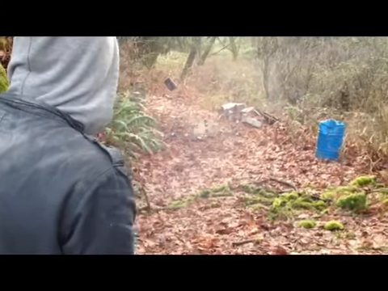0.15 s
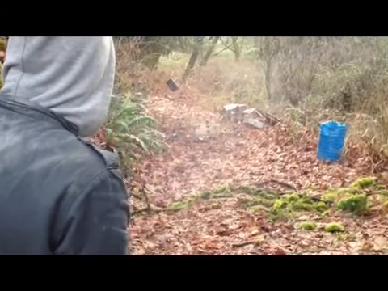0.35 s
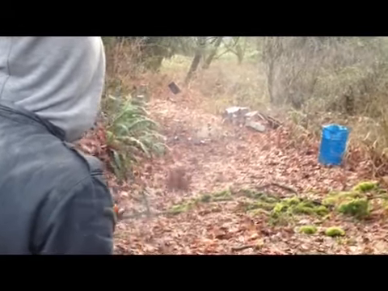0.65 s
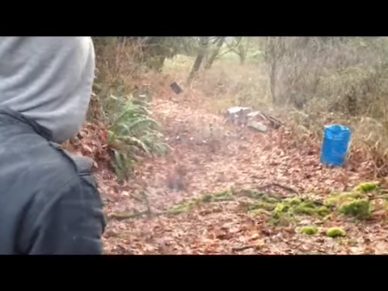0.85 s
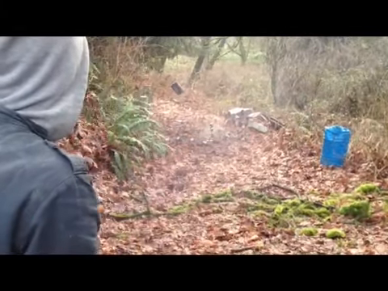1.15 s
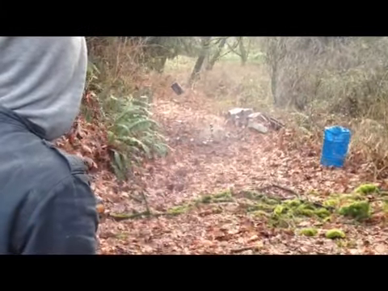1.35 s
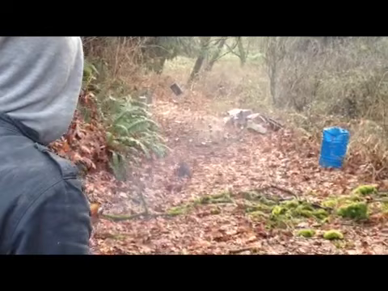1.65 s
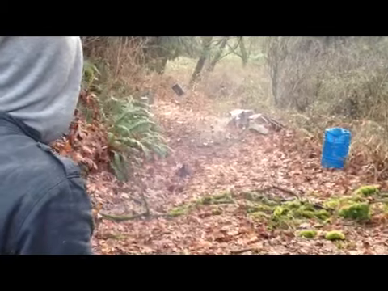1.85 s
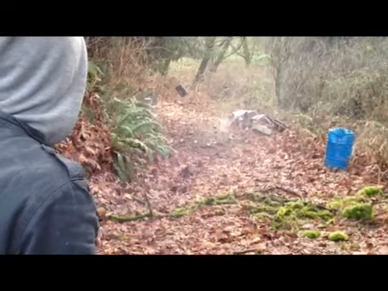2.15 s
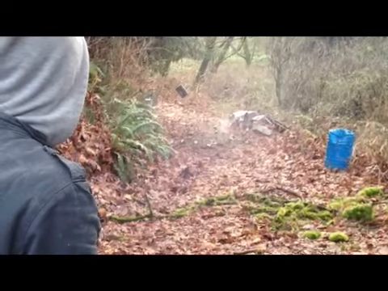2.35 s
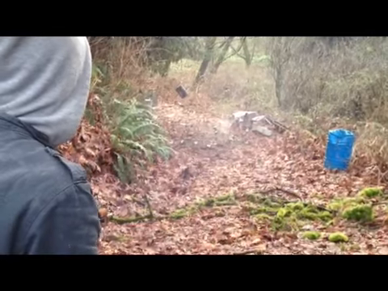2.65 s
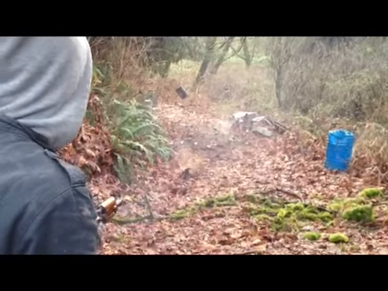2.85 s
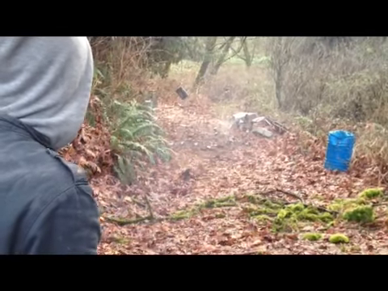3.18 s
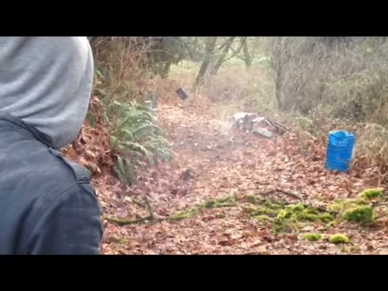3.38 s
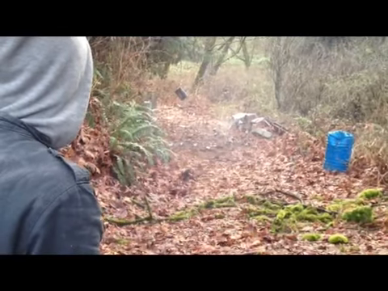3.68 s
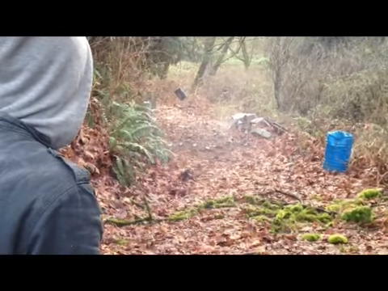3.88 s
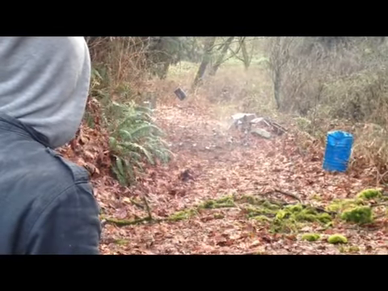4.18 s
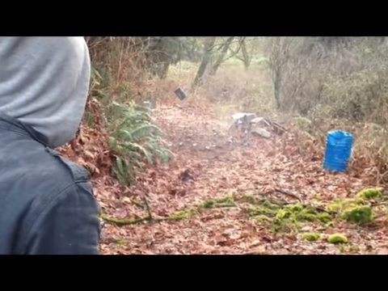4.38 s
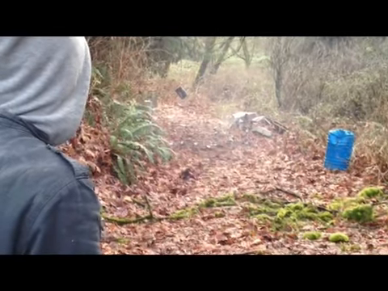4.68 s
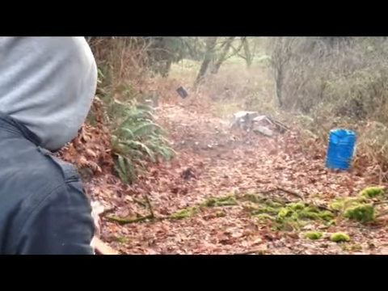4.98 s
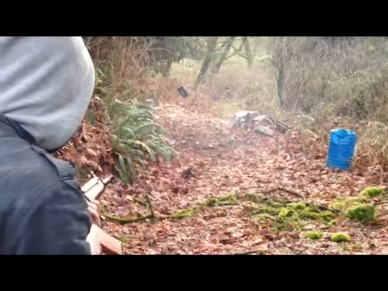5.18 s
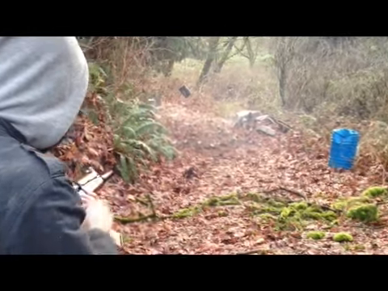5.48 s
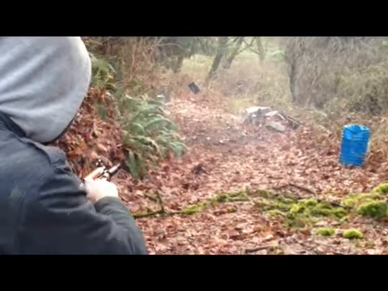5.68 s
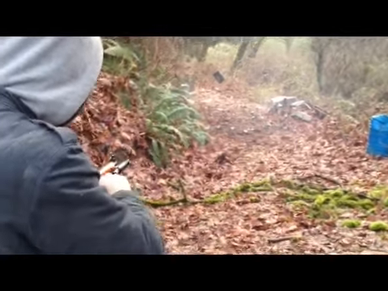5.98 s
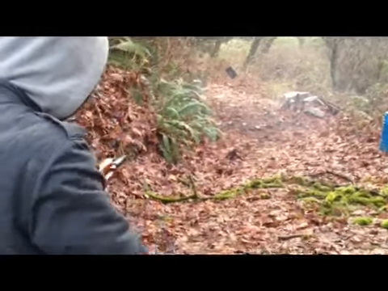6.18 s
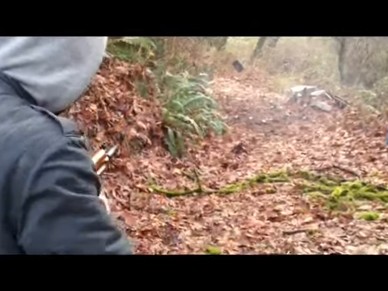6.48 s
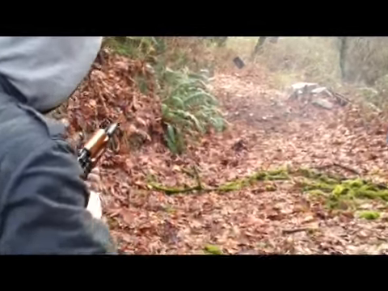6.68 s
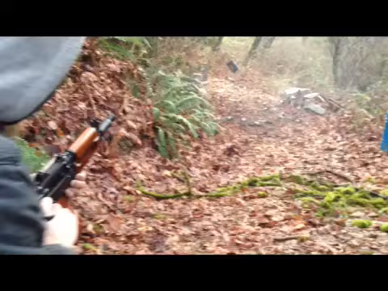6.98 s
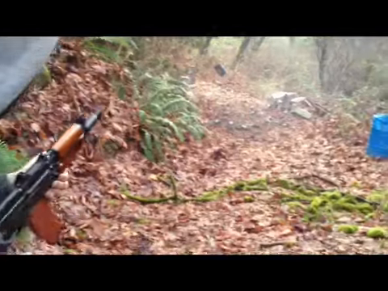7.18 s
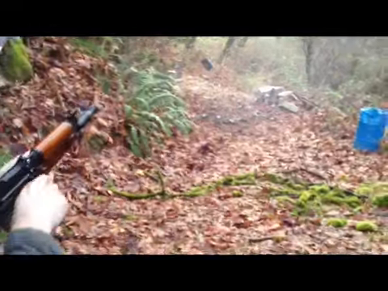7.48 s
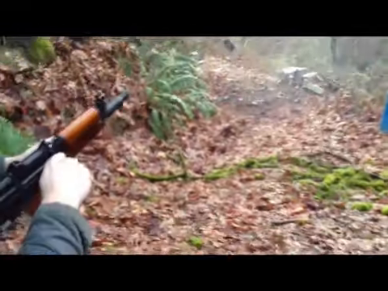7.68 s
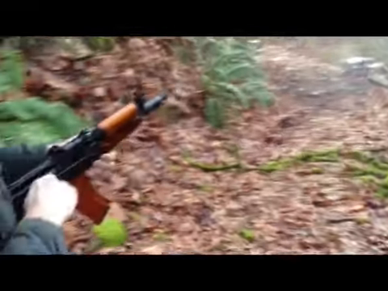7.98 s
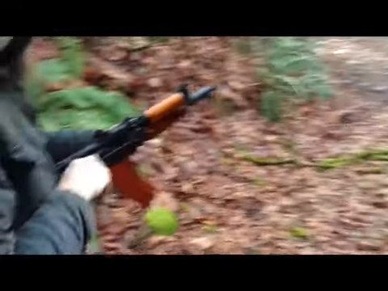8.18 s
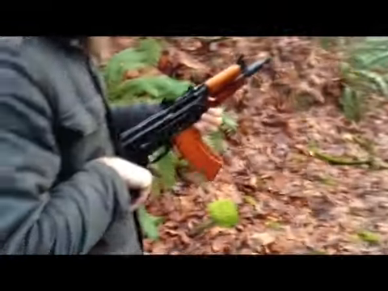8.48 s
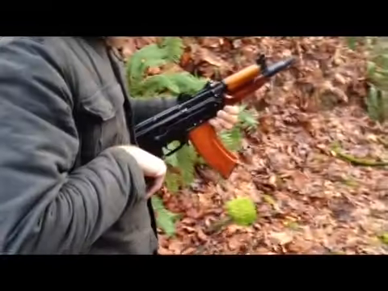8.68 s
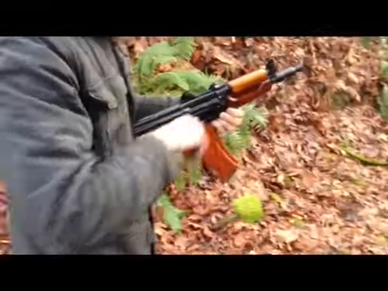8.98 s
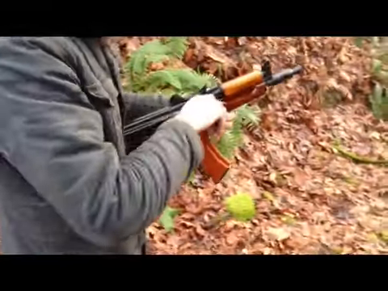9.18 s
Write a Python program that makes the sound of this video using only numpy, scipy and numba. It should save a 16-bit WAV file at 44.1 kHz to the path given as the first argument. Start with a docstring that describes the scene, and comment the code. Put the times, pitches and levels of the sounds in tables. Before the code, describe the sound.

The echo of earlier shots is dying away in a wood at the start. A rifle a couple of metres from the microphone fires three quick pairs of shots, at about 0.6, 1.5 and 2.8 seconds. Each loud, bright blast overloads the microphone and returns from trunks and a far slope in duller echoes that fade by about 5 seconds. Spent cases drop into dry leaves with small crackles until around 4 seconds. Over a faint outdoor hush, the rifle is then handled close by: a short cluster of steel clicks comes at 6.1 seconds, and the bolt snaps home with a hard clack and thin ring at 7.1. A rattling run of clacks follows near 7.9, and the bolt slams shut again at 8.3. Faint sleeve rubs sound between the clacks and around 9 seconds, with one last light click at 9.3.

```python
"""Rifle shots in a wood

A rifle fires quick pairs of shots a couple of metres from a phone; the first pair is already dying away.
Each blast overloads the microphone and comes back from trunks and a far slope; spent cases drop into
dry leaves. Then the bolt is worked by hand in steel clacks, with faint sleeve rubs and hiss between.
The phone's gain control ducks after each loud sound and creeps back."""
import sys
import numpy as np
from scipy import signal
from scipy.fft import rfft, irfft, next_fast_len
from scipy.io import wavfile
from scipy.ndimage import map_coordinates
from numba import njit

SR = 44100
rng = np.random.default_rng(int(sys.argv[2]) if len(sys.argv) > 2 else 0)


def int16_out(signal):
    """Quantize to a 16-bit WAV file."""
    q = np.round(np.clip(np.atleast_2d(signal).T, -1, 1) * 32767)
    wavfile.write(sys.argv[1], SR, q.astype(np.int16))


N = 411894
TIME = np.arange(N) / SR


# The rifle, a couple of metres off. Each row: start in seconds, level in dB.
SHOT_TIMES = [(-0.525, -1.5), (-0.408, -1.5), (0.622, 1.5), (0.730, 1), (1.5002, 2), (1.613, 2),
              (2.7731, 1), (2.9199, 3)]
# The muzzle blast with its bright splash off nearby leaves. Each row: frequency in Hz, level in dB.
BLAST_SPECTRUM = [(40, -16.5), (120, -9.5), (300, 0.5), (1000, 3), (2800, 2.5), (6000, 3), (9000, -6),
                  (15000, -11)]

def shots(blast_db=20, blast_t60=0.1, drift=.0004):
    """Every blast wakes the same echoes, their paths shifted a little as the muzzle moves."""
    out, echoes = np.zeros(N), wood()
    for s, db in SHOT_TIMES:
        paths = np.arange(N) * (1 + drift * rng.standard_normal())
        add(out, s, amp(db) * map_coordinates(echoes, [paths], order=3))
        add(out, s, amp(db + blast_db) * colour(burst(blast_t60), BLAST_SPECTRUM))
    return out


# Slaps off near banks, big trunks and rock faces. Each row: delay in seconds, level in dB.
SLAPS = [(.027, 7.5), (.047, 13), (.097, 7), (.205, -3), (.281, -3), (.417, -5.5), (1.183, -23),
         (1.215, -22.5), (1.355, -25.5), (2.495, -35.5), (4.12, -43)]
# The diffuse return and the slaps, before the air dulls them. Each row: frequency in Hz, level in dB.
DIFFUSE_SPECTRUM = [(40, -58), (75, -38.5), (110, -28), (170, -11), (290, 1), (440, -0.5), (660, 0),
                    (980, -7.5), (1400, -6), (3000, -7), (6000, -9), (8000, -12), (14000, -21)]
SLAP_SPECTRUM = [(40, -56.5), (90, -30), (200, -6), (330, 1.5), (450, 0.5), (700, 2.5), (1100, -9.5),
                 (2500, -15.5), (6000, -24), (14000, -50)]

def wood():
    """The wood answers a shot with countless small reflections in clumps, and some strong, dull ones."""
    clumps = grain(rate=140, spread_db=1.5) * grain(rate=29, spread_db=0.3)
    diffuse = rng.standard_normal(N) * clumps * return_gain(TIME)
    slaps = np.zeros(N)
    for s, db in SLAPS + trunk_echoes():
        add(slaps, s, amp(db) * strike(t60=.05, snap=.35))
    return colour(travel(diffuse), DIFFUSE_SPECTRUM) + colour(travel(slaps), SLAP_SPECTRUM)


def trunk_echoes(count=60, nearest_s=.23, per_second=14, spread_db=3):
    """Scattered trunks answer at random, fading with the wood. Each row: delay in seconds, level in dB."""
    place, size = rng.random(count), rng.standard_normal(count)
    delay = nearest_s + (np.arange(count) + place) / per_second
    return list(zip(delay, 20 * np.log10(return_gain(delay)) + spread_db * size))


# The clearing, the trees around it, a far slope and the distant forest.
# Each row: first arrival, swell and hold in seconds, level in dB, fade in dB a second.
ECHO_REGIONS = [ (0, 0.017, .09, -4.5, 171), (0.033, 0.023, 0.027, -8, 21), (1.55, .28, 0.32, -40, 25),
                (.5, .6, .5, -42.5, 5)]

def return_gain(t):
    """Strength of the wood's answer t seconds after a shot: each region swells, holds and fades."""
    power = 0
    for arrives, swell, hold, db, fade_db in ECHO_REGIONS:
        rise = np.clip((t - arrives) / swell, 0, 1)
        fading_s = np.maximum(t - arrives - swell - hold, 0)
        power = power + rise * amp(db - fade_db * fading_s) ** 2
    return np.sqrt(power)


def travel(x, loss_db=3.0, power=1.283):
    """The later a sound returns, the more treble the air has taken: loss_db a second at 1 kHz."""
    hz, s, frames = signal.stft(x, SR, nperseg=256)
    khz = hz[:, None] / 1000
    return signal.istft(frames * amp(-loss_db * khz ** power * s), SR)[1][:N]


def action(echo_db=-27, echo_t60=0.58):
    """The rifle's moving parts knock and ring close by; the trees send the knocks faintly back."""
    t = TIME[:2 * SR]
    trees = travel(rng.standard_normal(len(t)) * amp(-60 * t / echo_t60), loss_db=1.5)
    trees = colour(trees, [(60, -24.5), (200, -14.0), (1500, 3.5), (6500, 0), (12000, -1)])
    trees /= np.sqrt(np.sum(trees ** 2))
    knocks = hammer() + lock_up() + clacks()
    echo = signal.fftconvolve(knocks, trees)[:N]
    return knocks + amp(echo_db) * echo + rings()


# The pressed-steel receiver's crowd of short resonances. Each row: frequency in Hz, level in dB.
RECEIVER_SPECTRUM = [(40, -43.5), (150, -27.5), (500, -20.5), (700, -6.5), (880, -2), (1170, -12.5),
                     (1600, 1), (2100, 0), (2600, 3.5), (3500, 0.5), (4600, -.5), (5900, 2), (8000, -5),
                     (12500, -6), (15500, -16)]

def clacks(clack_db=-2.5, stock_db=-33, dull_thump=3.0):
    """Steel parts strike the receiver; the duller a contact, the more of it goes into the stock."""
    out = np.zeros(N)
    for s, db, t60, bright_db in contacts():
        clack = colour(strike(t60, snap=0.15), RECEIVER_SPECTRUM, bright_db)
        add(out, s, amp(db + clack_db) * panels(clack))
        add(out, s, amp(db + stock_db - dull_thump * bright_db) * thump(t60=.016))
    return out


def hammer(lead_s=0.01, level_db=-28):
    """The hammer falls just before each shot."""
    out = np.zeros(N)
    for s, _ in SHOT_TIMES:
        add(out, s - lead_s, amp(level_db) * colour(burst(t60=0.088), RECEIVER_SPECTRUM))
    return out


# Single clicks of catch, hammer and end stop.
# Each row: start in seconds, level in dB, t60 in seconds, brightness in dB per octave.
SINGLE_CLICKS = [ (4.920, -45, 0.076, -4), (6.081, -36.5, 0.22, -1.5), (6.148, -30.5, 0.076, -2),
                 (6.1714, -16.5, .04, -2.2), (6.226, -27, 0.13, -1), (7.578, -42.5, 0.045, -5),
                 (7.66, -30, 0.054, -6.5), (7.815, -36, 0.077, -5.5), (7.848, -22, .073, 3.5),
                 (7.8589, -11, .03, 1), (7.8682, -13, .048, 1), (7.894, -17.5, .052, 0.5),
                 (7.948, -14, .064, 2), (9.327, -30, .057, -0.5)]
# The bolt is let go and runs home. Each row: release in seconds, level in dB, relative thump in dB.
BOLT_RELEASES = [(7.111, 0, 0), (8.280, 1.5, -22)]
# The contacts of one run, ending in lock-up.
# Each row: seconds after release, level in dB, t60 in seconds, brightness in dB per octave.
BOLT_CONTACTS = [(0, -25, 0.081, -2), (.0083, -17, .11, -0.9), (.022, -11.5, .058, -1.8),
                 (0.0262, -4.5, 0.038, 1), (0.0366, -6.5, 0.084, 0.5), (.0493, 3.5, .05, 2),
                 (.0535, 2.5, 0.042, 1.5)]
# The carrier is drawn back along its rails. Each row: start and length in seconds, level in dB.
CARRIER_DRAWS = [(6.112, .06, -37.5), (6.178, .05, -29), (7.894, .068, -22)]

def contacts(count=24, chatter_per_s=100, spread_db=2, chatter_t60=0.062, chatter_bright_db=-2):
    """Steel meets steel in single clicks, the bolt's runs and the carrier's chatter."""
    rows = list(SINGLE_CLICKS)
    for s, db, _ in BOLT_RELEASES:
        rows += [(s + after, db + hit_db, t60, bright) for after, hit_db, t60, bright in BOLT_CONTACTS]
    for s, length, db in CARRIER_DRAWS:
        delays = (np.arange(count) + rng.random(count)) / chatter_per_s
        levels = db + spread_db * rng.standard_normal(count)
        rows += [(s + after, level, chatter_t60, chatter_bright_db)
                 for after, level in zip(delays, levels) if after < length]
    return rows


# The receiver's walls. Each row: frequency in Hz, peak in dB relative to the clack, t60 in seconds.
PANEL_MODES = [(800, 1.5, 0.025), (928, 4, .028), (1536, 3.5, 0.034), (1778, -6.5, .022),
               (2570, -5.5, 0.018), (3430, -.5, 0.0084), (5470, 4, .02), (6010, 0, 0.016), (6900, -2, .025),
               (8130, 3, .014)]

def panels(x, scatter_db=2, detune=0.043):
    """The receiver's walls ring briefly, a little differently at every contact."""
    t = TIME[:SR // 16]
    hz, db, t60 = np.transpose(PANEL_MODES)[:, :, None]
    share, shift = rng.standard_normal((len(PANEL_MODES), 2, 1)).transpose(1, 0, 2)
    decay = amp(db + scatter_db * share - 60 * t / t60)
    modes = decay * np.cos(2 * np.pi * hz * (1 + detune * shift) * t)
    response = np.sum(modes * 2 * np.log(1000) / (t60 * SR), axis=0)
    return x + signal.fftconvolve(x, response)[:len(x)]


def lock_up():
    """The bolt locks at the end of its run and shakes the whole rifle."""
    out = np.zeros(N)
    for s, db, thump_db in BOLT_RELEASES:
        add(out, s + BOLT_CONTACTS[-1][0], amp(db + thump_db) * thump(t60=.03))
    return out


# The wooden stock. Each row: frequency in Hz, level in dB.
STOCK_SPECTRUM = [(30, -23), (70, -11), (160, 6.5), (350, 1), (750, -3.5), (1400, -1.5), (6000, -48)]

def thump(t60):
    """A blow carries into the stock as a dull knock."""
    return colour(strike(t60, snap=0.65), STOCK_SPECTRUM)


# Barrel and spring, the spring a close pair that beats.
# Each row: frequency in Hz, level in dB, t60 in seconds.
RING_MODES = [(1480, -58, .63), (3312, -61, 2.6), (3332, -64, 2.6), (6498, -59, .34), (6977, -59, .34),
              (12740, -37, .33), (13650, -38, .16)]

def rings(lock_db=3, click_db=-11):
    """Clicks and, above all, lock-ups leave the barrel and spring ringing thinly."""
    jolts, t = np.zeros(N), TIME[:2 * SR]
    for s, db, thump_db in BOLT_RELEASES:
        add(jolts, s + BOLT_CONTACTS[-1][0], amp([db + lock_db + thump_db / 4]))
    for s, db, _, _ in SINGLE_CLICKS:
        add(jolts, s, amp([db + click_db]))
    ring = sum(amp(db - 60 * t / t60) * np.sin(2 * np.pi * hz * t) for hz, db, t60 in RING_MODES)
    return signal.fftconvolve(jolts, ring)[:N]


# Spent cases and bits of debris landing. Each row: start in seconds, level in dB, t60 in seconds.
CASE_DROPS = [(.183, -37, 0.043), (.235, -46, .06), (0.319, -43, .12), (0.564, -50, 0.097),
              (1.060, -25, 0.12), (1.926, -21, .08), (2.165, -43.5, 0.12), (2.612, -42.5, 0.052),
              (2.648, -49, 0.069), (3.708, -41, 0.038), (4.068, -50, 0.033)]
# Dry leaves on the ground. Each row: frequency in Hz, level in dB.
LEAF_SPECTRUM = [(500, -17.5), (2500, -3), (6000, -0.5), (13000, -4.5), (16000, -8)]

def cases():
    """Each small falling thing makes a short crackle in the dry leaves."""
    out = np.zeros(N)
    for s, db, t60 in CASE_DROPS:
        add(out, s, amp(db) * burst(t60))
    return colour(out * grain(rate=1800, spread_db=7.5), LEAF_SPECTRUM)


# Soft swells of rustling hiss: brief sleeve rubs, and one broad faint hiss between the clacks.
# Each row: middle and half length in seconds, level in dB.
RUSTLE_SWELLS = [(6.672, .06, -66), (7.602, .25, -60.5), (8.856, 0.062, -59), (9.096, 0.087, -50.5)]
# The rustle's cloth-like colour. Each row: frequency in Hz, level in dB.
RUSTLE_SPECTRUM = [(200, -6.5), (900, -3), (1500, -5), (2700, 3.5), (4000, -5.5), (6500, 1.5), (9000, -9),
                   (13000, -10.5), (16000, -14)]

def rustle(rest_db=-79):
    """A grainy hiss, like cloth sliding over cloth in small catches, swells and fades."""
    hiss = rng.standard_normal(N) * grain(rate=330, spread_db=2.0)
    swells = sum(amp(db) * np.exp(-((TIME - s) / half) ** 2) for s, half, db in RUSTLE_SWELLS)
    return colour(hiss, RUSTLE_SPECTRUM) * (amp(rest_db) + swells)


# Still air all around the microphone. Each row: frequency in Hz, level in dB.
AIR_SPECTRUM = [(30, -35), (60, -27), (90, -14.5), (240, 2), (500, -3), (1000, -4.5), (2000, -12.5),
                (3200, -14), (6000, -20.5), (9000, -27.5), (14000, -26.5)]

def air(level_db=-58):
    """The faint, slowly stirring hush of the wood."""
    return amp(level_db) * colour(rng.standard_normal(N) * grain(rate=5.5, spread_db=2.4), AIR_SPECTRUM)


def amp(db):
    """Decibels to gain."""
    return 10 ** (np.asarray(db) / 20)


def add(out, s, x):
    """Mix x into out from s seconds on."""
    i = int(round(s * SR))
    x, i = x[max(-i, 0):], min(max(i, 0), N)
    out[i:i + len(x)] += x[:N - i]


def colour(x, points, tilt_db=0):
    """Causal filter through (Hz, dB) points, tilted per octave; white noise keeps its power."""
    n = 2 * next_fast_len(len(x))
    octave = np.log2(np.maximum(np.arange(n // 2 + 1) * SR / n, 10))
    hz, db = np.transpose(points)
    tilt = tilt_db * np.maximum(octave, np.log2(hz[2]))
    gain = amp(np.interp(octave, np.log2(hz), db) + tilt)
    # minimum phase: nothing sounds ahead of a blow
    cepstrum = irfft(np.log(gain / np.sqrt(np.mean(gain ** 2))))
    cepstrum[1:n // 2] *= 2
    cepstrum[n // 2 + 1:] = 0
    return irfft(rfft(x, n) * np.exp(rfft(cepstrum)), n)[:len(x)]


def burst(t60):
    """Noise that starts at once and falls 60 dB in t60 seconds."""
    t = TIME[:SR // 2]
    return rng.standard_normal(len(t)) * amp(-60 * t / t60)


def strike(t60, snap):
    """A sharp pulse holding the share snap of the energy, then a dying rattle."""
    x = burst(t60)
    energy = t60 * SR / (2 * np.log(1000))
    x *= np.sqrt((1 - snap) * energy / np.sum(x ** 2))
    x[0] = np.sqrt(snap * energy)
    return x


def grain(rate, spread_db):
    """A gain of unit power that jumps about rate times a second."""
    gain = amp(spread_db * np.interp(TIME * rate, np.arange(N), rng.standard_normal(N)))
    return gain / np.sqrt(np.mean(gain ** 2))


def scene():
    """Shots, rifle handling and the quiet wood as they reach the phone, in mono."""
    return (shots() + action() + cases() + rustle() + air())[None]


def squash(x, ceiling):
    """Overload: clean at low levels, flattened near the ceiling."""
    return x / (1 + (x / ceiling) ** 4) ** .25


@njit
def follow(x, attack, release, level):
    """A level that rises quickly with the sound and sinks by a constant ratio every sample."""
    out = np.empty(len(x))
    for i in range(len(x)):
        level = max(level * release, level + (abs(x[i]) - level) * attack)
        out[i] = level
    return out


def excess(x, target, attack_s, release_db, start_db=0):
    """How many times the followed level exceeds the target; it recovers at release_db a second."""
    attack = 1 - np.exp(-1 / (attack_s * SR))
    release = float(amp(-release_db / SR))
    return np.maximum(follow(x / target, attack, release, float(amp(start_db))), 1)


# The dips of the phone's microphone port. Each row: frequency in Hz, level in dB.
PORT_RESPONSE = [(30, -9.5), (70, -9.5), (160, -2), (3300, -1), (4300, -7), (5600, -1), (7800, -1.5),
                 (10000, -8.5), (12500, -1), (15000, 0)]

def record(dry, overload=1.97, deepest_db=8.5, top_hz=15300):
    """The microphone overloads, its port colours the sound, slow gain control ducks, a limiter holds."""
    x = colour(squash(dry[0], overload), PORT_RESPONSE)
    # the gain starts out still ducked by the earliest pair of shots
    ducking = excess(x, target=0.57, attack_s=0.00073, release_db=6.0, start_db=5.5)
    x = x / np.minimum(ducking, amp(deepest_db))
    limiting = excess(x, target=0.71, attack_s=0.00052, release_db=151.5)
    x = squash(x / limiting, ceiling=0.89)
    lowpass = signal.ellip(10, .1, 70, top_hz, fs=SR, output="sos")
    return signal.sosfilt(lowpass, x)[None]


dry = scene()
out = record(dry)
int16_out(out)
```